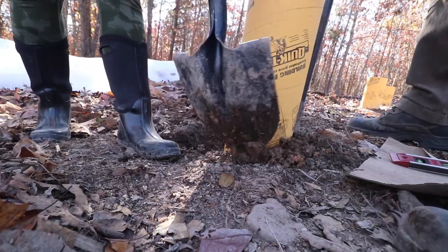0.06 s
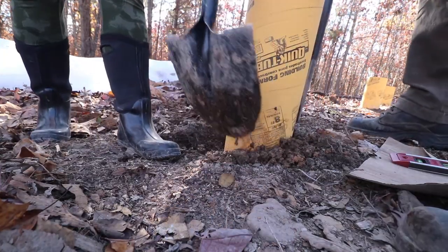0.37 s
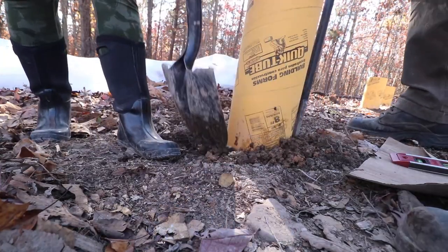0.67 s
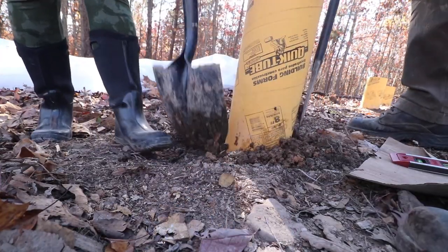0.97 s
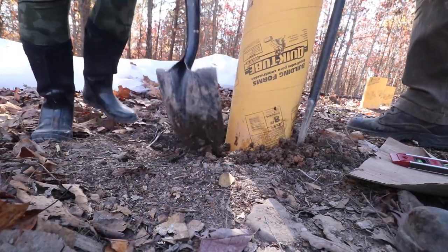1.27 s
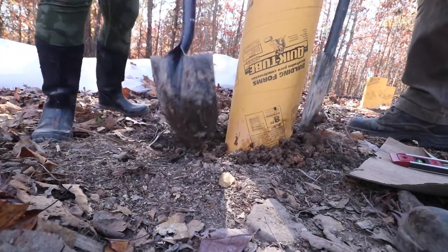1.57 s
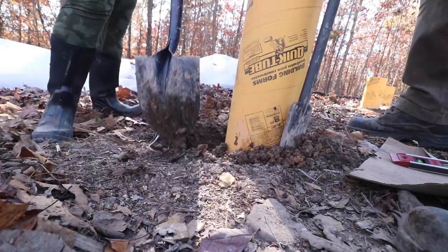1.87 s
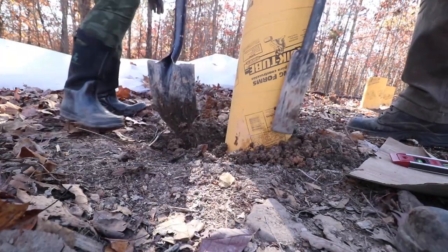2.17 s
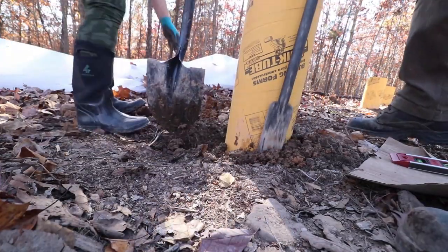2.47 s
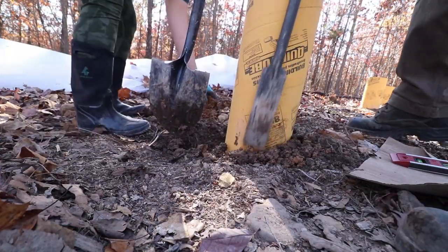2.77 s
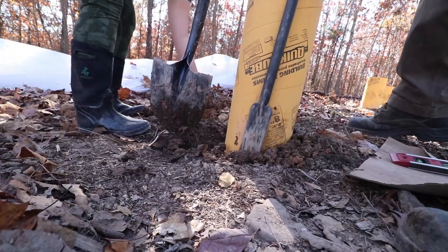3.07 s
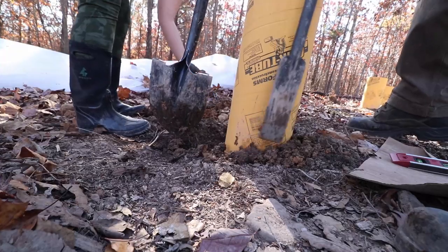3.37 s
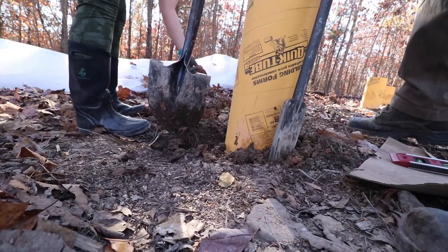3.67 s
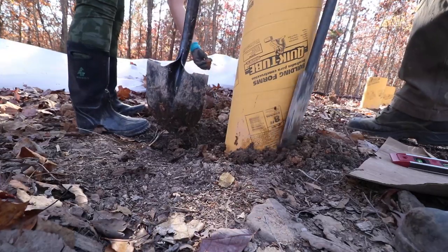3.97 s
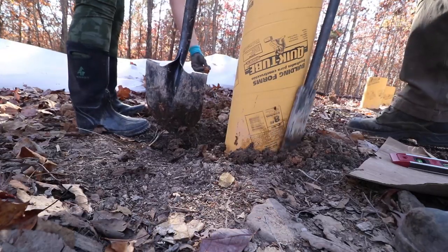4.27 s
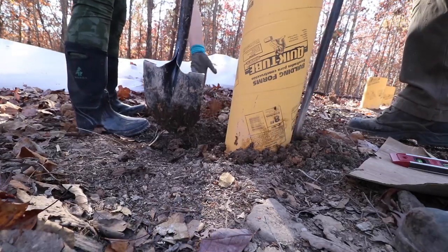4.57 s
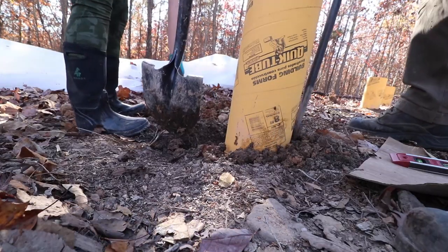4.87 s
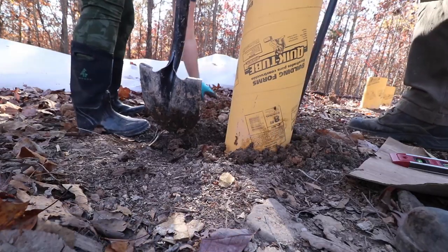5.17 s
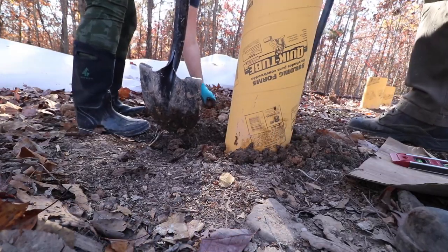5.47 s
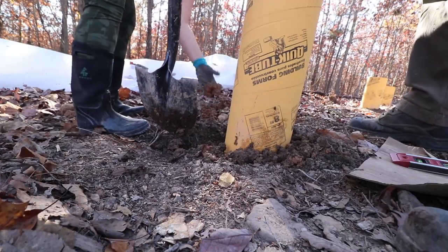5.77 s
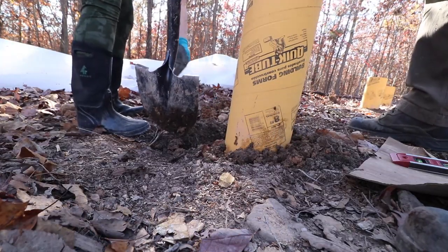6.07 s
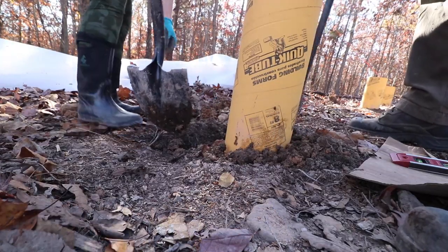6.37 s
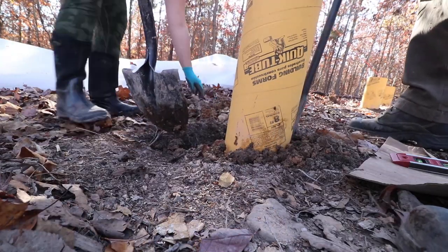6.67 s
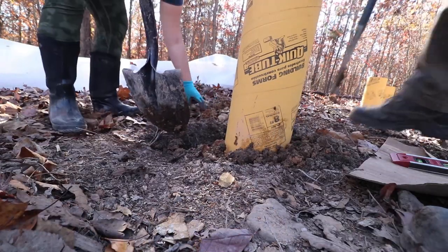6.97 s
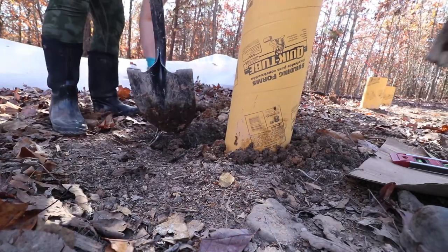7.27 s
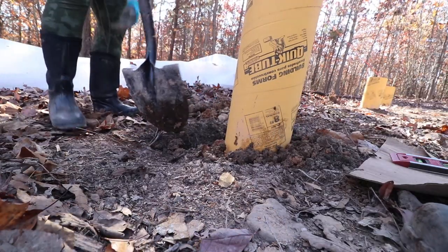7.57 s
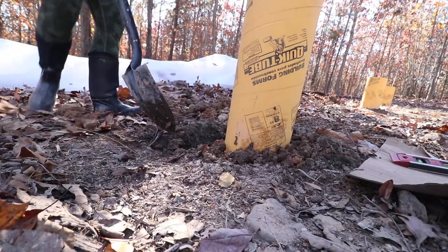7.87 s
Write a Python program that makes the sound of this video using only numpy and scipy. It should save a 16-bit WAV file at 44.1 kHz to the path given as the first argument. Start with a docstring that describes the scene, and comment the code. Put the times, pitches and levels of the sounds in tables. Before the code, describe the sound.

Close, repeated crunching of steel blades packing dirt, with dull thuds, stony clicks and dry leaves crackling underfoot in a wood.

```python
"""Packing soil in a wood.

Close by, a shovel, then a narrow spade, packs gritty dirt around a cardboard concrete form.
Blades stab into soil that firms with depth, knock on stones and clods, and ring faintly when
drawn back; the ground thuds and sand runs off the steel. Boots and a gloved hand stir dry
leaves and snap twigs over the even rush of the forest."""
import sys
import numpy as np
from scipy import signal
from scipy.io import wavfile
from scipy.ndimage import uniform_filter1d, minimum_filter1d

SR = 44100
rng = np.random.default_rng(int(sys.argv[2]) if len(sys.argv) > 2 else 0)


def generate_wav(signal):
    """Clip the signal to [-1, 1] and save it as 16-bit WAV at the path in sys.argv[1]."""
    frames = np.transpose(np.atleast_2d(signal))
    scaled = np.clip(frames, -1, 1) * 32767
    pcm = np.round(scaled).astype(np.int16)
    wavfile.write(sys.argv[1], SR, pcm)


N = 353676
TIME_S = np.arange(N) / SR

# Noise spectra of forest air, crushed soil, dry leaves, breaking twigs: freq_hz, relative_density_db
FOREST_SPECTRUM = [(15, -38), (25, -10.5), (64, 0.5), (92, -7), (153, -2.5), (195, -4.5), (293, -5.5),
                   (545, -6), (818, -2), (1480, -7), (1790, -7), (2110, -11), (4610, -10.5), (16000, -23)]
SOIL_SPECTRUM = [(47, -40), (80, -14), (316, -10.5), (471, -4), (687, -1), (877, -10.5), (1490, 0.5),
                 (1820, -3.5), (5280, -7), (6450, -13), (7870, -7.5), (10500, -17), (14300, -20.5),
                 (16000, -46)]
LEAF_SPECTRUM = [(120, -34), (200, -4), (806, 3), (1480, 2), (1620, 1.5), (4770, 1.5), (6400, -2),
                 (8580, 3), (10300, -10), (13600, -6), (16000, -12)]
TWIG_SPECTRUM = [(470, -37), (800, 10), (2100, 0), (3100, 13), (3790, 0.5), (7360, 10.5), (13600, -4),
                 (16000, 15)]
# Clod, grit and sand bands: low_hz, high_hz
ZONES_HZ = [(80, 1100), (1100, 5500), (5500, 16000)]
# Steel blade modes: pitch_hz, gain_db
SHOVEL_MODES = [(1394, -81), (1949, -30), (3564, -51), (5060, -59), (5459, -29), (6988, -48), (8156, -58),
                (8800, -19)]
SPADE_MODES = [(1427, -41), (1970, -39), (2293, -35), (2600, -34.5), (2998, -36), (3375, -38), (3784, -42),
               (4000, -32.5), (4640, -34), (5200, -53), (5539, -35), (5997, -34.5), (6546, -51),
               (6848, -58), (7569, -40), (8113, -28), (8689, -46), (9243, -45), (9765, -36), (11262, -45)]
# Boot falls: start_s, puff_db, boom_db
STEPS = [(0.009, -25, -27.5), (1.435, -31.5, -27.5), (2.115, -23.5, -40), (2.474, -35, -33),
         (7.044, -28.5, -53), (7.316, -32, -61), (7.584, -21.5, -32), (7.656, -23.5, -54),
         (7.906, -29, -45)]
# Blade drawn along or out of soil: peak_s, length_s, level_db, firmness (0 loose, 1 packed), ring_db
DRAGS = [(0.029, 0.17, -25, 0.74, -6), (0.083, 0.03, -28, 0.9, -27), (0.256, 0.054, -32.5, 0.78, -12),
         (0.578, 0.014, -32, .02, -23), (0.706, 0.023, -14, 0.7, -39), (0.938, 0.076, -26.5, 0.52, -18),
         (1.193, 0.015, -24, 0.38, 0.5), (1.443, 0.094, -15, 0.1, -15.5), (2.006, 0.18, -31, 0.2, -5),
         (2.524, 0.17, -30.5, 0.65, -6), (3.119, 0.065, -28, 0.87, -7), (3.184, 0.042, -23.5, 0.63, 5),
         (3.24, 0.038, -38, 0.68, 6), (4.324, 0.073, -17, .85, -6.5), (4.876, 0.21, -35.5, 0.83, -29),
         (6.578, 0.076, -34, 0.83, -6)]
# Blade meets stone or clod: start_s, peak_db, pitch_hz, treble_tilt_db
KNOCKS = [(0.12, 2, 1420, -1), (0.324, -13.5, 3280, 2), (0.597, 2.5, 2750, 18), (0.606, -19, 3920, 12),
          (0.616, -1, 1240, 2), (0.637, 1.5, 4410, 13), (0.7235, -5, 630, -7), (0.884, -7, 2660, 2),
          (1.051, -15.5, 640, -19), (1.147, 0, 890, -0.5), (1.353, 4, 1440, -5), (1.404, 5, 2710, 1.5),
          (1.551, -15, 626, -8.5), (1.764, -0.5, 3300, -9), (1.9157, -2, 324, -3), (2.881, -8, 2400, 10),
          (4.492, 3, 644, 6.5), (4.779, -10, 1010, -1), (5.241, -5, 1240, -6.5), (5.775, -7.5, 745, -4),
          (5.812, -16, 1220, -2), (5.995, -13, 740, 2), (6.046, -4, 1140, -2)]
# Blade driven into soil: start_s, bite_s, push_s, level_db, firmness, boom_db
STABS = [(0.311, 0.0055, 0.0053, -22.5, 0.014, -60), (0.582, 0.012, 0.024, -15.5, 0.2, -50),
         (0.71, 0.0106, 0.019, -23, 0.92, -29), (0.862, 0.019, 0.034, -21.5, 0.03, -60),
         (1.232, 0.054, 0.026, -9, 0.71, -29), (1.755, 0.012, .045, -18.5, 0.28, -50),
         (1.799, 0.028, 0.039, -15, 0.68, -31), (2.326, .016, 0.07, -16.5, 0.62, -43),
         (2.87, 0.012, 0.045, -14, 0.28, -34), (2.931, 0.019, 0.046, -16, 0.57, -28.5),
         (3.523, 0.017, 0.068, -15.5, 0.095, -29.5), (4.05, 0.032, 0.045, -15, 0.54, -44),
         (4.125, 0.02, 0.014, -16.5, 0.95, -32), (4.485, .008, 0.039, -21, 0.77, -43),
         (4.628, 0.042, 0.033, -14.5, 0.73, -30), (5.224, 0.032, 0.043, -13.5, 0.77, -31.5),
         (5.798, 0.012, 0.069, -20, 0.86, -32.5), (6.473, 0.017, 0.024, -18, 0.85, -34)]
# Boot or glove through leaves: start_s, length_s, level_db
SWEEPS = [(0.946, 0.66, -38), (1.715, 0.73, -29.5), (2.447, 0.16, -30.5), (6.36, 0.26, -34),
          (6.65, 0.21, -24.5), (6.936, 0.053, -27.5), (7.048, 0.84, -36.5), (7.607, 0.15, -28),
          (7.917, 0.14, -20.5)]
# Twigs and stems breaking: start_s, peak_db
SNAPS = [(1.6658, -20), (2.144, -7), (2.4698, -11), (2.817, -17), (3.684, -2.5), (3.7258, -11),
         (4.7711, -7.5), (4.9625, -7), (6.8295, -15), (6.8798, -12), (6.966, -26), (7.048, -16.5),
         (7.106, -14), (7.2755, -17)]

CLOD_DB, SAND_DB, HOLLOW_HZ = (-10, 4), (0, -12.5), (3104, 918)  # each: loose soil, packed soil


def from_db(db):
    """Decibels to gain."""
    return 10 ** (np.asarray(db) / 20)


def unit_rms(x):
    """Scale to rms 1."""
    return x / np.sqrt(np.mean(x ** 2) + 1e-20)


def unit_peak(x):
    """Scale to peak 1."""
    return x / np.abs(x).max()


def add(out, start_s, sound):
    """Mix a sound in at start_s."""
    at = max(0, round(start_s * SR))
    out[at:at + len(sound)] += sound[:N - at]


def around(at_s):
    """Sample span near at_s, and its times relative to at_s."""
    span = slice(max(0, round(at_s * SR) - SR // 4), round(at_s * SR) + SR // 2)
    return span, TIME_S[span] - at_s


def blend(ends, firmness):
    """Linear blend, loose to packed."""
    return ends[0] + (ends[1] - ends[0]) * firmness


def band(x, low_hz, high_hz):
    """Causal band-pass."""
    sos = signal.butter(2, [low_hz, high_hz], "band", fs=SR, output="sos")
    return signal.sosfilt(sos, x + 1e-18)


def ring(x, pitch_hz, t60_s):
    """One damped mode; a unit click rings at height 1."""
    radius, angle = from_db(-60 / (t60_s * SR)), 2 * np.pi * pitch_hz / SR
    return signal.lfilter([0, np.sin(angle)], [1, -2 * radius * np.cos(angle), radius ** 2], x + 1e-18)


def wander(spread_db, rate_hz):
    """Smooth random gain, clipped at twice its spread."""
    hop, warmup = 20, 2000
    pole = np.exp(-2 * np.pi * rate_hz * hop / SR)
    noise = rng.standard_normal(N // hop + warmup + 2)
    slow = unit_rms(signal.lfilter([1], [1, -2 * pole, pole ** 2], noise)[warmup:])
    drift = np.interp(np.arange(N) / hop, np.arange(len(slow)), slow)
    return from_db(spread_db * np.clip(drift, -2, 2))


def grains(per_s, spread_db, clump_db, clump_hz):
    """Tiny random fractures, clumping as material sticks and gives."""
    sizes = from_db(spread_db * np.minimum(rng.exponential(1, N), 4))
    return (rng.random(N) < per_s / SR) * sizes * wander(clump_db, clump_hz)


def coloured(drive, spectrum, low_hz, high_hz, wander_db, wander_hz):
    """Noise scaled by drive, in third-octave bands of wandering strength; rms 1."""
    freq_hz, density_db = np.transpose(spectrum)
    edges_hz = np.geomspace(low_hz, high_hz, round(3 * np.log2(high_hz / low_hz)) + 1)
    out = 0
    for low, high in zip(edges_hz, edges_hz[1:]):
        band_db = np.interp(np.log(low * high) / 2, np.log(freq_hz), density_db)
        gain = from_db(band_db) * wander(wander_db, wander_hz)
        out += gain * band(drive * rng.standard_normal(N), low, high)
    return unit_rms(out)


def burst(hold_s, t60_s):
    """Crumbling contact: noise holds, then decays."""
    t = TIME_S[:SR // 2]
    return rng.standard_normal(len(t)) * from_db(-60 * np.maximum(t - hold_s, 0) / t60_s)


def forest():
    """Even broadband rush of the woods."""
    return from_db(-38) * coloured(1, FOREST_SPECTRUM, 25, 16000, wander_db=0.8, wander_hz=8)


def boom():
    """Springy soil swings low and dies away; peak 1."""
    t = TIME_S[:SR // 2]
    pitch_hz = 64 * from_db(rng.normal(0, 1))
    swing = np.sin(2 * np.pi * pitch_hz * t) * (1 - np.exp(-t / 0.013)) * np.exp(-t / 0.066)
    rumble = band(burst(hold_s=0.041, t60_s=0.16), 60, 125)
    return unit_peak(unit_peak(swing) + from_db(-2) * unit_peak(rumble))


def ground():
    """Ground rumbles under each push, then springs back; rubber soles land with a dull puff."""
    rebound_lag_s = 0.012
    out = np.zeros(N)
    for start_s, bite_s, push_s, _, _, boom_db in STABS:
        rumble = unit_peak(band(burst(hold_s=push_s, t60_s=0.08), 62, 150))
        add(out, start_s + bite_s, from_db(boom_db + 4) * rumble)
        add(out, start_s + bite_s + push_s + rebound_lag_s, from_db(boom_db) * boom())
    for start_s, puff_db, boom_db in STEPS:
        puff = unit_peak(band(burst(hold_s=0.0013, t60_s=0.062), 110, 360))
        add(out, start_s, from_db(puff_db) * puff + from_db(boom_db) * boom())
    return out


def drags():
    """Drawn blade: force swells and fades at constant firmness. Yields strokes for scraping()."""
    edge_db, swell_share, roundness = 17, 0.56, 0.87
    firming, clod_db = 0, 1.5
    for peak_s, length_s, level_db, firmness, ring_db in DRAGS:
        span, t = around(peak_s)
        off_peak = np.maximum(-t / swell_share, t / (1 - swell_share)) / length_s
        force_db = level_db - edge_db * off_peak ** roundness
        yield span, force_db, length_s / 2, firmness, firming, clod_db, ring_db


def stabs():
    """Blade grazes litter, bites, sinks into firmer soil, stalls. Yields strokes for scraping()."""
    graze_db_per_s, sag_db_per_s, stall_db_per_s, firming_per_s = 340, 16, 722, 8.9
    clod_db, ring_db = 0, -19  # buried steel rings little
    for start_s, bite_s, push_s, level_db, firmness, _ in STABS:
        span, t = around(start_s)
        graze_db = -28 + graze_db_per_s * np.minimum(t, 0)
        bite_db = -27 * np.maximum(1 - t / bite_s, 0)
        sag_db = sag_db_per_s * (np.clip(t - bite_s, 0, push_s) - push_s / 2)
        stall_db = stall_db_per_s * np.maximum(t - bite_s - push_s, 0)
        force_db = level_db + np.maximum(graze_db, bite_db) - sag_db - stall_db
        firming = firming_per_s * (np.clip(t - bite_s, -bite_s, push_s) - push_s / 2)
        yield span, force_db, bite_s + push_s, firmness, firming, clod_db, ring_db


def scraping():
    """The same small slips crush clods, grind grit and brush sand. Returns sound, drive on the steel."""
    slips = grains(per_s=7000, spread_db=3, clump_db=3.5, clump_hz=97)
    clods = coloured(slips, SOIL_SPECTRUM, *ZONES_HZ[0], wander_db=4, wander_hz=5.6)
    grit = coloured(slips, SOIL_SPECTRUM, *ZONES_HZ[1], wander_db=2, wander_hz=23)
    sand = coloured(slips, SOIL_SPECTRUM, *ZONES_HZ[2], wander_db=-0.5, wander_hz=36)
    friction = slips * rng.standard_normal(N)
    out, drive = np.zeros(N), np.zeros(N)
    for span, force_db, contact_s, firmness, firming, clod_db, ring_db in [*drags(), *stabs()]:
        hollow_hz = np.exp(blend(np.log(HOLLOW_HZ), firmness))
        hollow = unit_rms(ring(friction[span], hollow_hz, t60_s=0.02))
        sand_gain = from_db(blend(SAND_DB, firmness + firming))
        clod_gain = from_db(blend(CLOD_DB, firmness + firming) + clod_db)
        bright = grit[span] + from_db(-9.5) * hollow + sand_gain * sand[span]
        low_cut_hz = 50 + 420 * np.exp(-contact_s / 0.031)  # short jab: little soil moved, little bass
        crunch = band(clods[span], low_cut_hz, 5200) + from_db(-11.5) * hollow
        out[span] += from_db(force_db) * (bright + clod_gain * crunch)
        drive[span] += from_db(force_db + ring_db) * bright
    return out, drive


def blade(drive, modes, buried_t60_s, free_t60_s, free_db):
    """Soil-damped steel modes with a faint longer ring; the moving contact shifts their strengths."""
    out = 0
    for pitch_hz, gain_db in modes:
        push = drive * from_db(gain_db) * wander(spread_db=3, rate_hz=30)
        out += ring(push, pitch_hz, buried_t60_s) + from_db(free_db) * ring(push, pitch_hz, free_t60_s)
    return out


def plate_shimmer(drive):
    """A thin plate's many weak modes, about evenly spaced, slightly weaker toward the top."""
    modes_hz = np.arange(2100, 15000, 210)
    gains = rng.uniform(0.3, 1, len(modes_hz)) * rng.choice([-1, 1], len(modes_hz))
    gains *= (modes_hz / modes_hz[0]) ** -0.1
    return sum(gain * ring(drive, pitch_hz + rng.uniform(-100, 100), t60_s=0.13)
               for gain, pitch_hz in zip(gains, modes_hz))


def knocks():
    """Hard contact crushes a little soil; stone and buried blade ring briefly."""
    seating = 1 - np.exp(-TIME_S[:SR // 2] / 0.0016)
    out = np.zeros(N)
    for start_s, peak_db, pitch_hz, tilt_db in KNOCKS:
        contact = seating * burst(hold_s=0.0031, t60_s=0.036)
        zones_db = (9.5 - tilt_db, 14, 7.5 + tilt_db)
        crack = sum(from_db(db) * unit_rms(band(contact, *zone)) for db, zone in zip(zones_db, ZONES_HZ))
        crack = unit_rms(band(crack, 206, 13000))  # too small a blow to move the ground
        body = unit_rms(ring(contact, pitch_hz, t60_s=0.015))
        add(out, start_s, from_db(peak_db) * unit_peak(crack + from_db(-1.5) * body))
    return out


def sweep_envelope():
    """Each sweep sets leaves going, eases off, lets them settle."""
    attack_s, sag_db_per_s, settle_db_per_s = 0.021, 9.5, 99
    envelope = 0
    for start_s, length_s, level_db in SWEEPS:
        t = np.maximum(TIME_S - start_s, 0)
        fall_db = sag_db_per_s * t + settle_db_per_s * np.maximum(t - length_s, 0)
        envelope = np.maximum(envelope, np.minimum(t / attack_s, 1) * from_db(level_db - fall_db))
    return envelope


def leaves():
    """Swept leaves rub in a dense swish and crackle in clumps; a few settle throughout."""
    crackle_share = 0.45  # of power
    folds = grains(per_s=1200, spread_db=5.4, clump_db=2, clump_hz=45)
    crackle = coloured(folds, LEAF_SPECTRUM, 194.6, 15020, wander_db=0.5, wander_hz=3.9)
    rubs = grains(per_s=14000, spread_db=2.5, clump_db=1.5, clump_hz=45)
    swish = coloured(rubs, LEAF_SPECTRUM, 191, 14400, wander_db=4, wander_hz=16)
    stirred = np.sqrt(crackle_share) * crackle + np.sqrt(1 - crackle_share) * swish
    return stirred * sweep_envelope() + from_db(-48.5) * crackle


def twig_snaps():
    """Each dry stem breaks in one bright crack."""
    t = TIME_S[:SR // 30]
    fracture = np.exp(-t / 0.00043) + from_db(-7) * np.exp(-t / 0.004)
    breaks, out = np.zeros(N), np.zeros(N)
    for start_s, _ in SNAPS:
        add(breaks, start_s, fracture)
    cracks = coloured(breaks, TWIG_SPECTRUM, 900, 16000, wander_db=1.5, wander_hz=8)
    for start_s, peak_db in SNAPS:
        crack = cracks[round(start_s * SR):][:len(t)]
        add(out, start_s, from_db(peak_db) * unit_peak(crack))
    return out


def sand_trickle(peak_s, slope_db_per_s):
    """Fine grains patter down the lifted spade; the flow swells and fades."""
    flow = from_db(-43.5 - slope_db_per_s * np.abs(TIME_S - peak_s))
    patter = grains(per_s=1500, spread_db=1.7, clump_db=2.6, clump_hz=62) * rng.standard_normal(N)
    return flow * unit_rms(band(patter, 5000, 13000))


def scene():
    """Shovel, then spade, among leaves in open air; mono."""
    soil, scrape_drive = scraping()
    hits = knocks()
    sand = sand_trickle(peak_s=3.82, slope_db_per_s=191)
    drive = scrape_drive + from_db(-25.5) * hits
    on_spade = TIME_S > 1.6
    spade = blade(drive * on_spade + sand, SPADE_MODES,
                  buried_t60_s=0.061, free_t60_s=0.23, free_db=-17.5)
    shovel = blade(drive * ~on_spade, SHOVEL_MODES, buried_t60_s=0.031, free_t60_s=0.27, free_db=-35)
    steel = from_db(7.5) * spade + from_db(5) * shovel + from_db(-32.5) * plate_shimmer(drive)
    digging = soil + hits + from_db(5.5) * sand + steel
    return (digging + twig_snaps() + ground() + leaves() + forest())[None]


def limiter(x, ceiling_db, release_db_per_s):
    """Peaks pull the gain down at once; it creeps back."""
    over_db = np.maximum(20 * np.log10(np.abs(x[0]) + 1e-9) - ceiling_db, 0)
    release_db = release_db_per_s * TIME_S
    held_db = np.maximum.accumulate(over_db + release_db) - release_db
    gain_db = uniform_filter1d(minimum_filter1d(-held_db, size=31), size=31)
    return x * from_db(gain_db)


def record(dry):
    """Limiter, soft clip, steep low-pass."""
    clip_level, cutoff_hz = 0.66, 16000
    limited = limiter(dry, ceiling_db=-3.5, release_db_per_s=41)
    rounded = clip_level * np.tanh(limited / clip_level)
    return signal.sosfilt(signal.ellip(10, 0.2, 80, cutoff_hz, fs=SR, output="sos"), rounded)


dry = scene()
out = record(dry)
generate_wav(out)
```